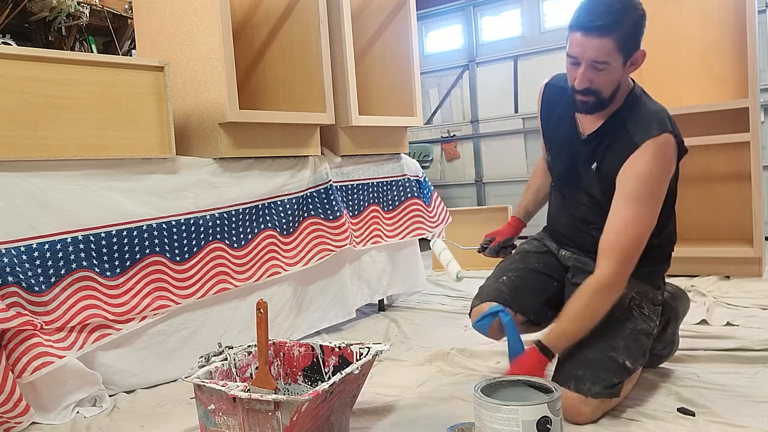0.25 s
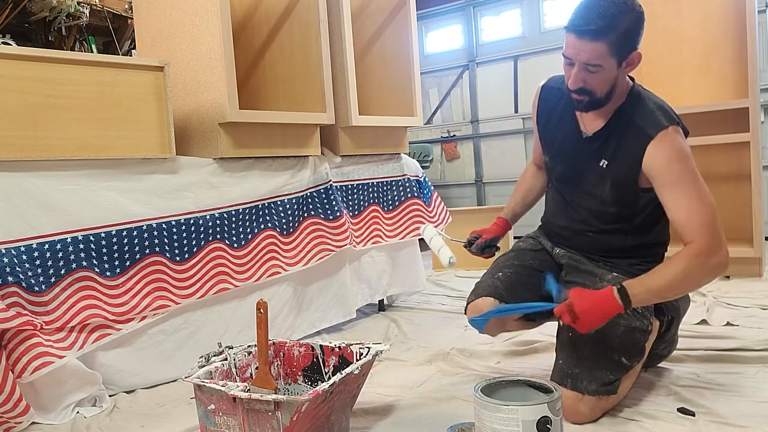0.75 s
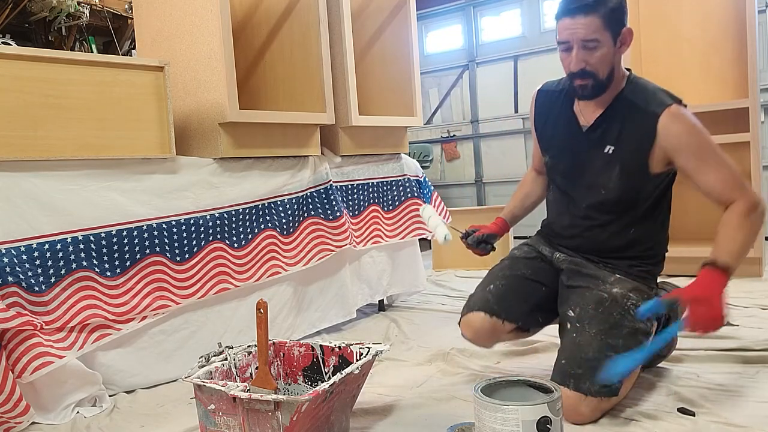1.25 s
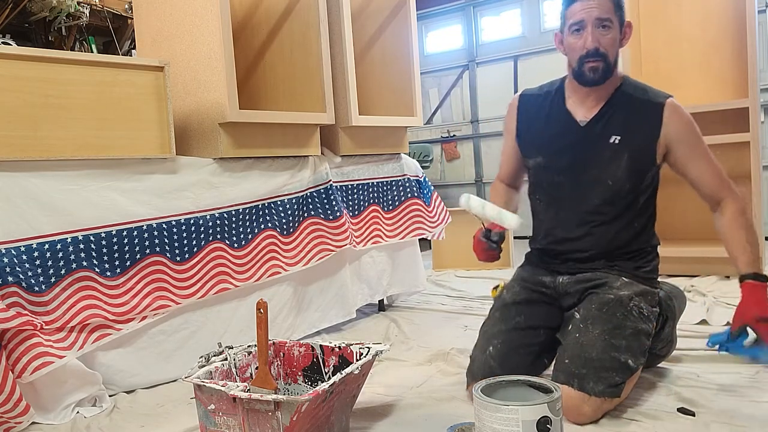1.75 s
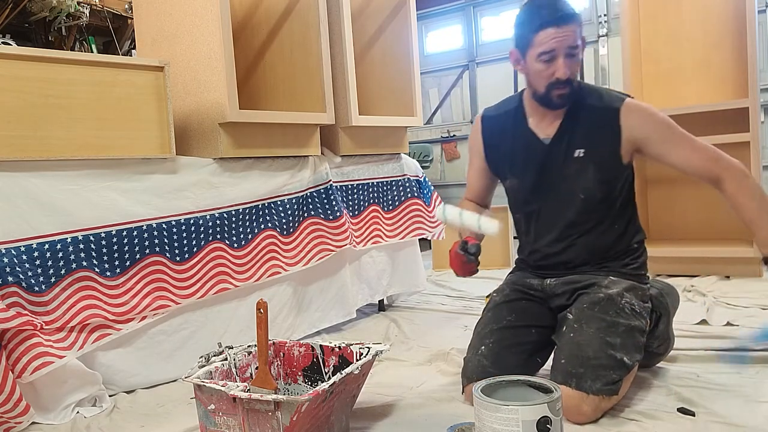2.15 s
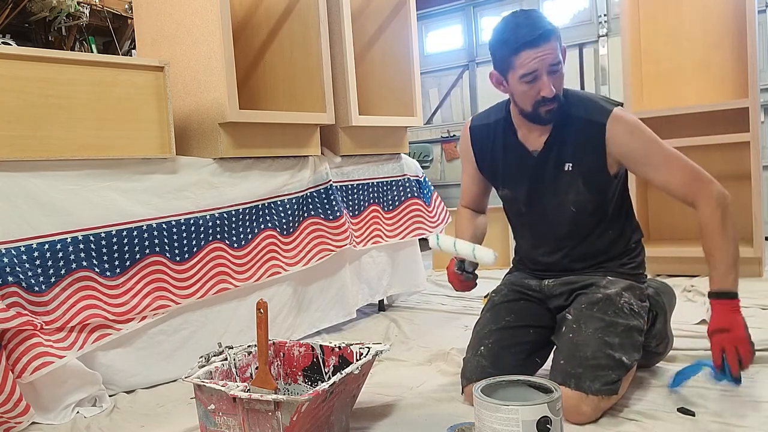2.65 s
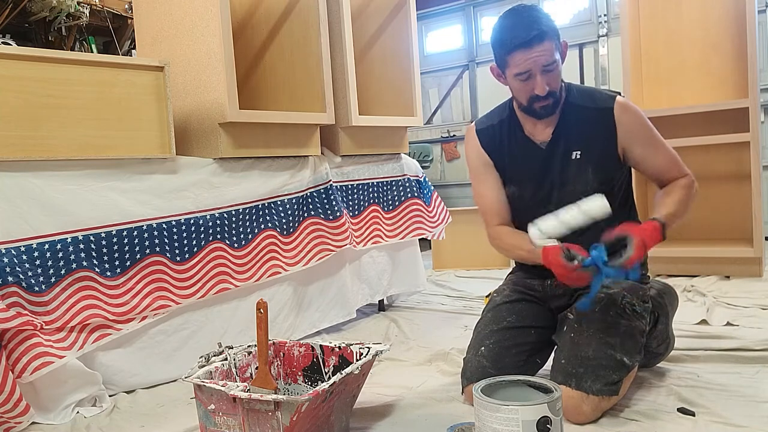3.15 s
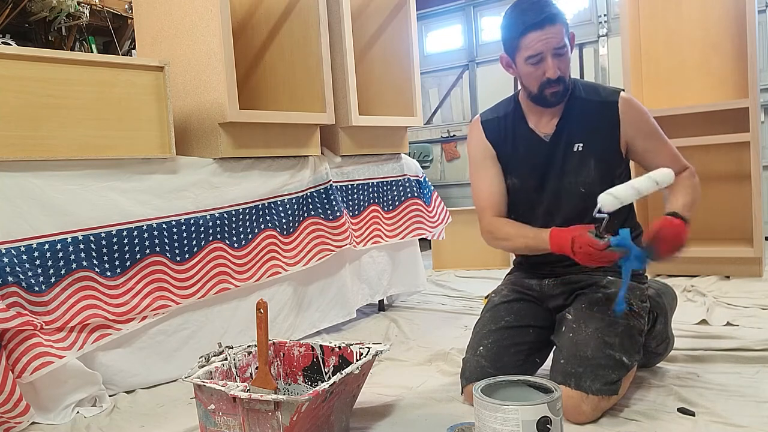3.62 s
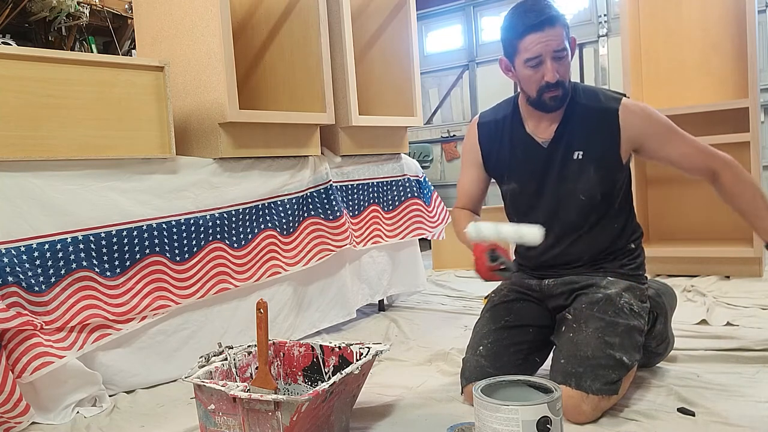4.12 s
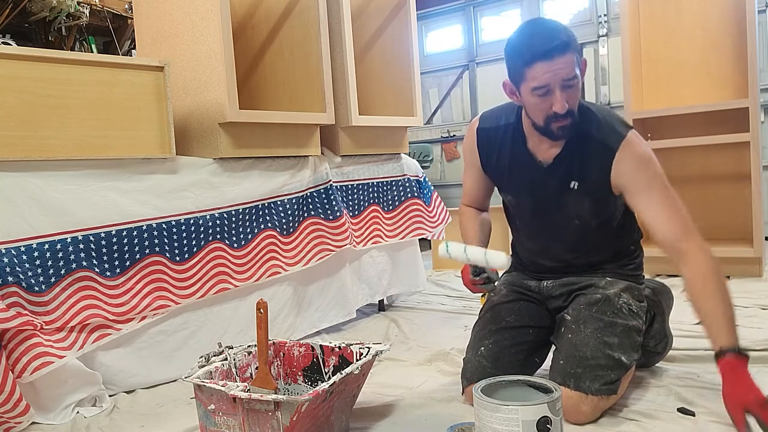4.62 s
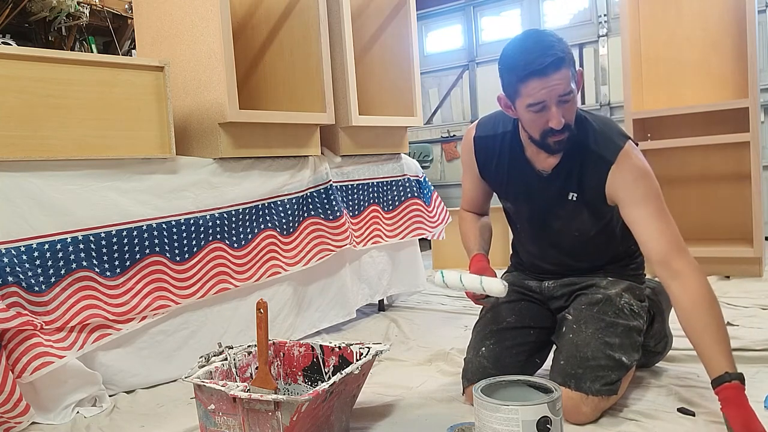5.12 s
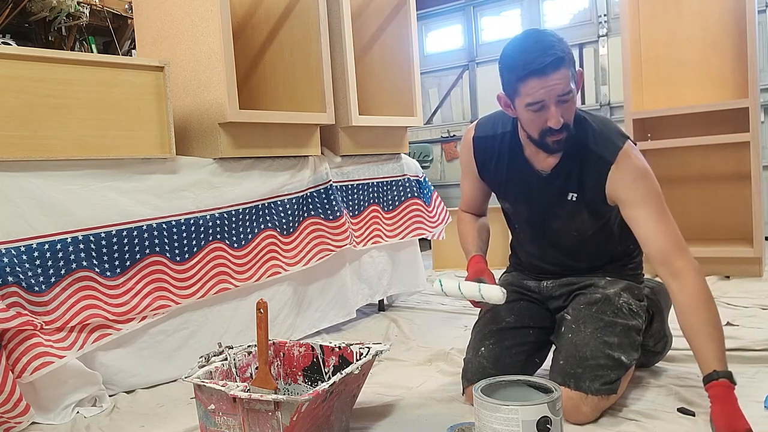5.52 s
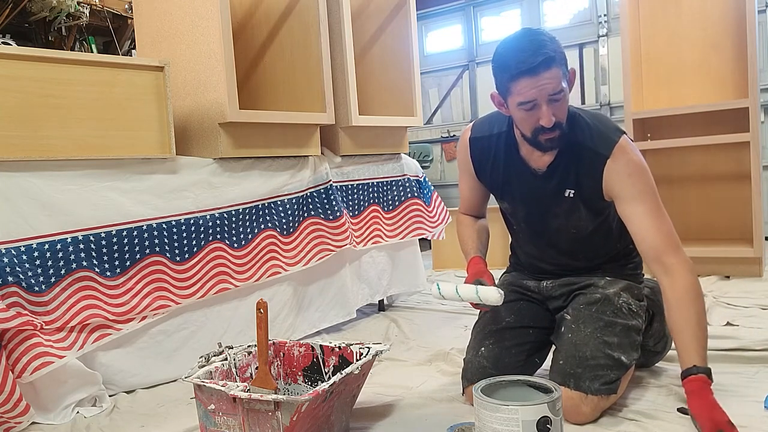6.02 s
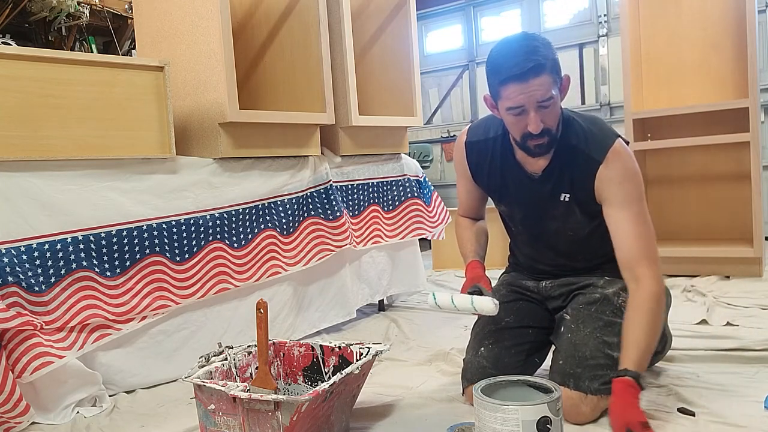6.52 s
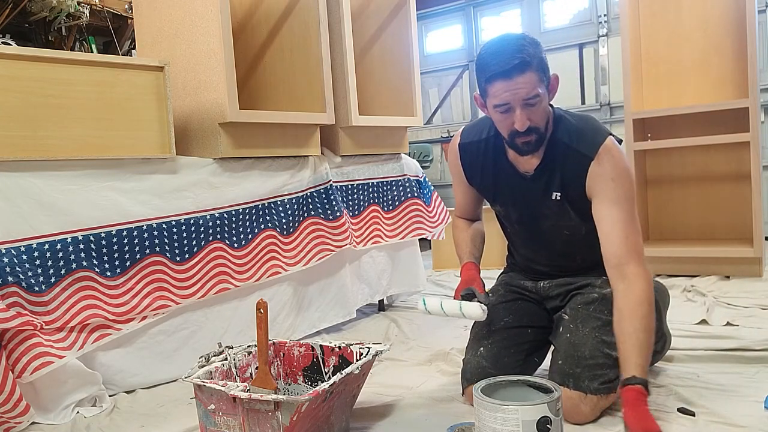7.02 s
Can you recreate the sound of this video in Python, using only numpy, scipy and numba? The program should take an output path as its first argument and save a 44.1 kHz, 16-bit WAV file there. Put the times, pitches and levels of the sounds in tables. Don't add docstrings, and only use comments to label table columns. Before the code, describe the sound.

In a garage, hands handle sticky tape about a metre from a phone microphone. Short bright rips, dull pats and crumpling scrunches come in irregular bursts with sharp snaps, and a soft knee thump lands near two seconds. After four seconds the tape stops and a glove slides on a drop cloth with faint dry hiss. A low throbbing fan hum and airy room noise run throughout.

```python
import sys
import numpy as np
from scipy import signal
from scipy.fft import rfft, irfft, next_fast_len
from scipy.io import wavfile
from scipy.ndimage import uniform_filter1d
from numba import njit

SR = 44100
rng = np.random.default_rng(int(sys.argv[2]) if len(sys.argv) > 2 else 0)


def volts(x):
    e = np.asarray(x, float) / 20
    return 10 ** e


def digitize_waveform(pressure):
    field = np.atleast_2d(pressure).T
    bounded = np.clip(field, -1, 1)
    quanta = np.round(bounded * 32767).astype(np.int16)
    wavfile.write(sys.argv[1], SR, quanta)


N = 320166

# (t/s, f/Hz)
FAN_BLADE_RATE = [(0, 111.64), (1.4, 111.64), (2.1, 111.51), (2.8, 111.51), (3.5, 111.65), (4.2, 111.74),
                  (4.9, 111.73), (5.6, 111.84), (6.3, 111.77), (7.3, 111.77)]
# (multiple, level/dB)
FAN_HARMONICS = [(1, -50), (2, -64.5), (3, -72.5), (6, -71.5)]
# (f/Hz, density/dB per Hz)
AIR_SPECTRUM = [(125, -20.5), (160, -24), (230, -26), (380, -29), (630, -27), (1220, -30), (2500, -37),
                (4900, -47.5), (6100, -60.5), (6900, -94), (8000, -65.5), (10500, -67.5), (12700, -56.5),
                (13000, -85)]
# (f/Hz, density/dB per Hz)
RUMBLE_SPECTRUM = [(12, -37.5), (20, -22.5), (81, -11.5), (86, -35), (88, -18), (95, -24.5), (120, -3.5),
                   (210, -120)]
# (f/Hz, width/Hz, level/dB)
AIR_RESONANCES = [(383.5, 49, -62), (455.6, 25, -67), (576, 24, -68.5), (1243, 29, -73.5),
                  (4400, 19, -84.5), (4910, 70, -81)]
# (f/Hz, likeness/0-1)
PORT_LIKENESS = [(60, 1), (130, 0.7), (290, 0.97), (640, 0.31), (1400, 0.2), (3000, .05), (16000, 0.46)]
# (f/Hz, level/dB)
HANDS_LEAN = [(200, -1.5), (700, 1), (1300, 2), (2400, 2), (4400, 9), (8100, 6.5), (15000, 6)]
# (f/Hz, level/dB)
AIR_LEAN = [(110, -2.5), (700, 1.5), (1300, 1.5), (4400, 3.5), (15000, 0.5)]
# (f/Hz, level/dB)
PORT_COLOUR = [(200, 9), (5700, 0), (6450, -6), (6900, -18), (7400, -7), (8500, -3), (11000, 1), (16000, 3)]
# (t/s, level/dB, f/Hz, t60/s, push/ms)
BLOWS = [(0.017, -31, 1274, 0.073, 1.3), (0.018, -38, 359, 0.19, 6.7), (0.807, -36, 380, 0.079, 2),
         (.83, -54, 59.5, .2, 8), (.992, -39, 356, 0.12, 3), (.995, -51, 65, 0.22, 8),
         (1.75, -46, 840, .08, 3), (1.855, -42, 35.3, 0.48, 15), (1.9144, -20.5, 77.7, 0.12, 11),
         (1.941, -34, 69.6, 0.34, 19), (6.589, -40.5, 299, .12, 1.5)]
# (start t/s, rise/s, hold/s, hiss level/dB, scrape level against hiss/dB)
GLOVE_STROKES = [
    (4.36, .02, .1, -86.5, 8),
    (4.82, 0.088, 0.03, -78, 11.5),
    (5.02, .03, 0.25, -83.5, 6.5),
    (5.697, 0.14, .05, -92.5, 6),
    (6.03, 0.024, .1, -91, 11.5),
    (6.135, .03, 0.29, -79, 2),
    (6.419, 0.069, 0.13, -70, -5),
    (6.73, 0.023, 0.18, -89.5, 14.5),
    (7.2, 0.032, .01, -84, -4),
]
# (t/s, peak level/dB, ring f/Hz)
BRIGHT_SNAPS = [(0.0159, -20, 1280), (0.0364, -28, 1400), (0.0884, -33, 9000), (0.2934, -48, 4800),
                (0.6838, -50, 4000), (0.7441, -30, 5410), (0.9402, -35, 4820), (0.989, -25, 5850),
                (1.0164, -30, 5430), (1.3484, -47, 4970), (1.4849, -50, 4000), (1.5009, -37, 4720),
                (1.7365, -43, 3180), (1.7423, -41, 3240), (1.8232, -31, 3790), (2.151, -50, 5500),
                (2.2188, -21, 4670), (2.5904, -46, 3380), (2.6094, -44, 4500), (2.6308, -22, 3380),
                (2.6533, -25, 2980), (2.7061, -23, 3800), (2.8618, -44, 3040), (3.0743, -47, 3460),
                (3.2863, -32, 5170), (3.6066, -50, 5350), (3.8092, -25, 5050), (3.1915, -41, 4500),
                (3.9608, -50, 3700), (4.2706, -58, 5500)]
# (t/s, peak level/dB, ring f/Hz)
DULL_TICKS = [(0.2003, -32, 3370), (0.2184, -38, 3140), (0.4797, -32, 4800), (0.8085, -18, 3910),
              (1.1841, -36, 3400), (1.3572, -45, 3390), (1.6341, -37, 3770), (1.7822, -39, 3100),
              (2.4996, -35, 3100), (2.5084, -36, 3100), (2.5164, -31, 3210), (2.5959, -37, 3000),
              (3.0578, -44, 3300), (3.208, -40, 3040), (3.6181, -32, 4220), (3.7268, -34, 3510),
              (3.9927, -39, 3300), (4.124, -44, 3300), (4.132, -48, 2800)]
# (start t/s, rise/s, hold/s, crackle level/dB, tape ring f/Hz)
TAPE_RIPS = [(0.0, 0.00067, 0.078, -43, 4650), (0.05, .04, 0.072, -41.5, 3730),
             (0.476, 0.0061, 0.028, -48, 4670), (0.71, 0.046, 0.0038, -38.5, 4340),
             (0.803, 0.0017, 0.033, -43.5, 4950), (0.937, 0.0018, 0.034, -51, 4900),
             (0.985, 0.0041, 0.031, -36.5, 5400), (1.34, 0.0085, 0.014, -61.5, 4450),
             (1.494, 0.0054, 0.043, -54.5, 2480), (1.665, 0.004, 0.018, -60, 2970),
             (1.728, 0.0054, 0.046, -53.5, 3280), (1.82, 0.0021, 0.0032, -46, 3240),
             (2.2, 0.018, 0.058, -42, 3270), (2.6, 0.054, 0.06, -43, 3600),
             (2.855, 0.045, 0.016, -52, 3750), (3.06, 0.048, 0.0077, -60, 3830),
             (2.93, 0.018, 0.075, -66.5, 3000), (3.26, 0.035, 0.017, -40, 4300),
             (3.606, 0.011, 0.045, -53, 4400), (3.74, 0.046, 0.0086, -43.5, 3220),
             (3.78, 0.033, 0.02, -41, 3400), (3.955, 0.0046, 0.024, -63, 3630),
             (4.112, .012, 0.023, -65, 2820)]
# (start t/s, rise/s, hold/s, crackle level/dB, tape ring f/Hz)
TAPE_PATS = [(0.195, 0.0033, 0.0032, -47, 3300), (0.475, 0.0039, 0.0083, -58.5, 4700),
             (0.53, 0.017, .01, -48.5, 3290), (0.68, 0.0042, 0.012, -59.5, 3300),
             (1.181, 0.0014, 0.0034, -47, 3400), (1.345, .01, .02, -61, 3706),
             (1.631, .003, .01, -59.5, 3460), (2.125, 0.02, .01, -61, 2960),
             (2.497, .002, 0.028, -50, 3060), (2.588, 0.021, 0.0092, -52, 3010),
             (2.858, 0.0024, .01, -45.5, 3170), (3.04, .022, 0.025, -59.5, 3200),
             (3.19, 0.017, 0.021, -51, 3390), (3.63, 0.0085, 0.071, -58, 4200),
             (3.98, 0.0078, 0.01, -51.5, 3430), (4.12, 0.0046, 0.023, -56, 2330),
             (4.255, 0.016, .06, -77, 2800)]
# (start t/s, rise/s, hold/s, crackle level/dB, tape ring f/Hz)
TAPE_SCRUNCHES = [(0.0, 0.0052, 0.11, -47, 1660), (0.39, 0.087, 0.027, -57, 3300),
                  (0.70, 0.017, 0.008, -56, 3600), (0.79, 0.0047, 0.051, -47, 4000),
                  (0.985, .006, 0.015, -46.5, 4630), (1.45, 0.039, 0.094, -58, 2200),
                  (1.66, 0.034, .01, -56.5, 2930), (1.89, 0.046, .03, -66, 2880),
                  (2.14, 0.048, .02, -62, 2990), (3.22, 0.043, 0.083, -49.5, 3490),
                  (3.722, .006, 0.036, -47.5, 3370), (3.79, 0.01, 0.024, -44, 3430)]

# body/dB and sizzle/dB against the crackle, share ringing the tape/0-1,
# fall/dB per s, sizzle fall/dB per s
RIP_VOICE = (-9.5, -5, 0.01, 375, 504.5)
PAT_VOICE = (-10, -18, 0.99, 246.5, 291)
SCRUNCH_VOICE = (0.5, -15, 0.8, 300.5, 399.5)

MAINS_HZ, MAINS_DB = 119.972, -52
THROB_S = 0.020
AIR_DB, RUMBLE_DB = -56, -64
GLOVE_FALL_DB_PER_S, FIDGET_DB = 410, -99
SNAP_T60_S, SNAP_DB = 0.009, -1
SNAP_SIZZLE_DB, TICK_SIZZLE_DB = -12, -21
RISE_DB = 20
RUSTLE_DB, RUSTLE_BODY_DB, RUSTLE_SIZZLE_DB, RUSTLE_HZ = -75.5, 7, -10.5, 2820
HANDS_REST_S, SETTLE_DB_PER_S = 4.3, 120
STRIP_LIKENESS = 0.5
ROOM_T60_S, ROOM_TOP_T60_S, ROOM_DB = 0.24, 0.037, -10
NEAR_T60_S, NEAR_DB = 0.012, -8
RIGHT_LAG_SAMPLES, MOVE_S = (5, 18), 0.2
TOP_HZ, EDGE_HZ = 15950, 350

T = np.arange(N) / SR
COARSE_T = T[::32]
PADDED = next_fast_len(N + 8192)
HZ = np.maximum(np.arange(PADDED // 2 + 1) * SR / PADDED, 1)


def unit(x):
    return x / np.sqrt(np.mean(x ** 2))


def along(table):
    hz, value = np.transpose(table)
    return np.interp(np.log(HZ), np.log(hz), value)


def colour(x, gain):
    return irfft(rfft(x, PADDED) * gain, PADDED)[..., :N]


def band(x, lo_hz, hi_hz):
    edges = [lo_hz, min(hi_hz, 0.45 * SR)]
    return signal.sosfilt(signal.butter(2, edges, "band", fs=SR, output="sos"), x)


def walk(rate_hz):
    hold = int(SR / rate_hz)
    levels = np.repeat(rng.standard_normal(N // hold + 1), hold)
    return 0.99 * uniform_filter1d(levels, hold)[:N]


def stroke(start_s, rise_s, hold_s, db, fall_db_per_s):
    peak_s = start_s + rise_s
    climb = RISE_DB * np.maximum(peak_s - COARSE_T, 0) / max(rise_s, 0.001)
    fall = fall_db_per_s * np.maximum(COARSE_T - peak_s - hold_s, 0)
    return volts(2 * (db - np.minimum(climb + fall, 100)))


def fine(x):
    return np.interp(T, COARSE_T, x)


def hum():
    t, hz = np.transpose(FAN_BLADE_RATE)
    turn = 2 * np.pi * np.cumsum(np.interp(T, t, hz)) / SR
    turn = turn - turn[int(THROB_S * SR)]
    fan = sum(volts(db + 0.27 * walk(1.1)) * np.cos(k * turn) for k, db in FAN_HARMONICS)
    mains = volts(MAINS_DB) * np.cos(2 * np.pi * MAINS_HZ * (T - THROB_S))
    whine_turn = 2 * np.pi * 291.5 * T
    whine_left = volts(-66) * np.cos(whine_turn)
    whine_right = volts(-61) * np.cos(whine_turn + 1.8)
    whine = np.array([whine_left, whine_right]) * volts(0.49 * walk(5.4))
    return np.sqrt(2) * (fan + mains + whine)


def air():
    like = np.clip(along(PORT_LIKENESS), 0, 1)
    lean = along(AIR_LEAN) / 2
    mid = rfft(rng.standard_normal(N), PADDED) * np.sqrt((1 + like) / 2)
    side = rfft(rng.standard_normal(N), PADDED) * np.sqrt((1 - like) / 2)
    noise = np.array([mid + side, mid - side]) * volts(np.array([lean, -lean]))

    def heard(gain):
        return irfft(noise * gain, PADDED)[:, :N]

    def whole(gain):
        return gain * PADDED / np.sqrt(2 * N * np.sum(np.abs(gain) ** 2)) / np.sqrt(2)

    shape = volts(AIR_DB) * whole(volts(along(AIR_SPECTRUM)))
    octave = np.round(np.log2(HZ / 125))
    out = np.zeros((2, N))
    for k in range(8):
        flicker = volts(1.1 * walk(9) + 0.4 * walk(1.5))
        out += heard(shape * (octave == k)) * flicker
    out += volts(RUMBLE_DB + 1.9 * walk(3.8)) * heard(whole(volts(along(RUMBLE_SPECTRUM))))
    resonances = np.zeros(len(HZ))
    for hz, width, db in AIR_RESONANCES:
        resonances += volts(db) * whole(1 / (1 + (2 * (HZ - hz) / width) ** 2))
    return out + heard(resonances)


def thumps():
    out, t = np.zeros(N), T[:SR // 2]
    for s, db, hz, t60, push_ms in BLOWS:
        swell = 1 - np.exp(-t * 1000 / push_ms)
        out[int(s * SR):][:len(t)] += volts(db - 60 * t / t60) * swell * np.sin(2 * np.pi * hz * t)
    return out


def threads(spread_db, clump_db, clump_hz):
    uneven_db = spread_db * np.minimum(rng.exponential(size=N), 6)
    sizes = volts(uneven_db + clump_db * walk(clump_hz))
    shared, own = rng.standard_normal((2, N))
    other = STRIP_LIKENESS * shared + np.sqrt(1 - STRIP_LIKENESS ** 2) * own
    return unit(np.array([shared, other]) * sizes)


def glove():
    soft, rough = np.zeros((2, len(COARSE_T)))
    for s, rise, hold, db, scrape_db in GLOVE_STROKES:
        soft += stroke(s, rise, hold, db, GLOVE_FALL_DB_PER_S)
        rough += stroke(s, rise, hold, db + scrape_db, GLOVE_FALL_DB_PER_S)
    soft += volts(2 * (FIDGET_DB + 6 * walk(12)[::32]))
    fibres = threads(spread_db=2.0, clump_db=3.0, clump_hz=50)
    hiss = unit(colour(fibres, volts(np.interp(HZ, [7500, 10800, 16000], [-24, 0, -8]))))
    scrape = unit(band(fibres, 1000, 4300))
    return np.sqrt(fine(soft)) * hiss + np.sqrt(fine(rough)) * scrape


def snaps():
    out, t = np.zeros(N), T[:2048]
    for rows, sizzle_db in ((BRIGHT_SNAPS, SNAP_SIZZLE_DB), (DULL_TICKS, TICK_SIZZLE_DB)):
        for s, db, hz in rows:
            burst = rng.standard_normal(len(t)) * volts(-60 * t / SNAP_T60_S)
            burst[0] = 14.0
            tone = band(burst, hz / 1.2, hz * 1.2)
            spit = band(burst, 4500, 19500)
            snap = tone / abs(tone).max() + volts(sizzle_db + 9) * spit / abs(spit).max()
            alone_db = min(db + 2, (db - 29) / 2)
            out[int(s * SR):][:len(t)] += volts(alone_db + SNAP_DB) * snap
    return out


@njit
def ring(x, hz, width):
    y, b, l = np.empty(len(x)), 0., 0.
    for i in range(len(x)):
        g, k = np.tan(np.pi * hz[i] / SR), width / hz[i]
        v = (b + g * (x[i] - l)) / (1 + g * (g + k))
        b, l, y[i] = 2 * v - b, l + 2 * g * v, k * v
    return y


def tape():
    settle_db = np.clip(SETTLE_DB_PER_S * (COARSE_T - HANDS_REST_S), 0, 60)
    rustle = volts(2 * (RUSTLE_DB - settle_db))
    power, ringing, pitch = rustle, rustle / 2, rustle / 2 * RUSTLE_HZ
    deep, bright = rustle * volts(2 * RUSTLE_BODY_DB), rustle * volts(2 * RUSTLE_SIZZLE_DB)
    kinds = ((TAPE_RIPS, RIP_VOICE), (TAPE_PATS, PAT_VOICE), (TAPE_SCRUNCHES, SCRUNCH_VOICE))
    for pulls, (body_db, sizzle_db, ring_share, fall, sizzle_fall) in kinds:
        for s, rise, hold, db, hz in pulls:
            pull = stroke(s, rise, hold, db, fall)
            rings = ring_share * pull
            power = power + pull
            ringing = ringing + rings
            pitch = pitch + hz * rings
            deep = deep + volts(2 * body_db) * pull
            bright = bright + stroke(s, rise, hold, db + sizzle_db, sizzle_fall)
    power, ringing, pitch, deep, bright = map(fine, (power, ringing, pitch, deep, bright))

    clicks = threads(spread_db=3.1, clump_db=1.5, clump_hz=250)
    rung = unit(np.array([ring(port, pitch / ringing, 900.) for port in clicks]))
    loose = unit(band(clicks, 1800, 6600))
    crackle = np.sqrt(power - ringing) * loose + np.sqrt(ringing) * rung
    body = unit(band(clicks, 1040, 2740)) + volts(-6.0) * unit(band(clicks, 284, 579))
    sizzle = unit(band(clicks, 6200, 19500))
    return volts(-2.5) * (crackle + np.sqrt(deep) * body) - np.sqrt(bright) * sizzle


def echoes():
    t = T[:SR // 4]
    near, far = rng.standard_normal((2, 2, len(t)))
    far = far * (t > 0.004)
    low = signal.sosfilt(signal.butter(1, 6000, fs=SR, output="sos"), far)
    tail = low * volts(-60 * t / ROOM_T60_S) + (far - low) * volts(-60 * t / ROOM_TOP_T60_S)
    scatter = near * volts(-60 * t / NEAR_T60_S)
    echo = volts(ROOM_DB) * unit(tail) + volts(NEAR_DB) * unit(scatter)
    echo = echo / np.sqrt(len(t))
    echo[1, rng.integers(*RIGHT_LAG_SAMPLES)] += 1
    echo[0, 0] += 1
    return echo


def room(x):
    step = int(MOVE_S * SR)
    fade = np.sin(np.pi * np.arange(2 * step) / (2 * step))
    padded = np.pad(x, ((0, 0), (step, 2 * step)))
    out = np.zeros((2, padded.shape[1] + SR))
    for start in range(0, N + step, step):
        stretch = padded[:, start:start + 2 * step] * fade
        heard = signal.fftconvolve(stretch, echoes(), axes=1)
        out[:, start:start + heard.shape[1]] += heard
    return out[:, step:step + N]


def scene():
    left, right = room(tape() + snaps() + glove())
    side = colour(left - right, np.sqrt(1 - np.clip(along(PORT_LIKENESS), 0, 1)))
    stereo = np.array([left + right + side, left + right - side]) / 2
    lean = along(HANDS_LEAN) / 2
    hands = colour(stereo, volts(along(PORT_COLOUR) + np.array([lean, -lean])))
    return hands + thumps() + hum() + air()


def band_limit(x):
    return signal.sosfilt(signal.butter(12, 16790, fs=SR, output="sos"), x)


def record(dry):
    top_cut = np.clip((TOP_HZ - HZ) / EDGE_HZ, 0, 1) ** 2
    return band_limit(colour(dry, top_cut))


dry = scene()
out = record(dry)
digitize_waveform(out)
```